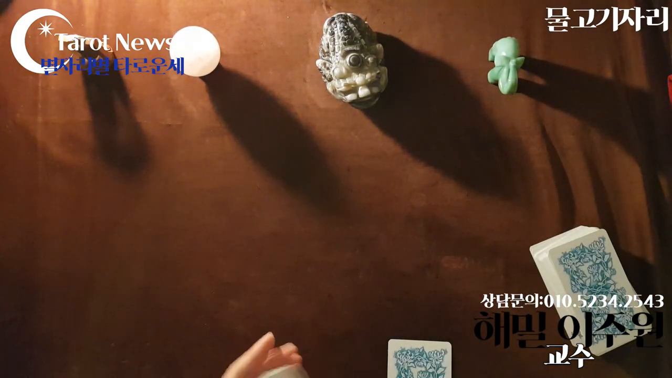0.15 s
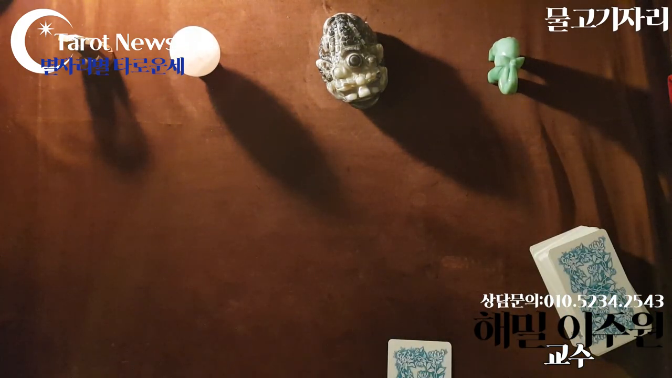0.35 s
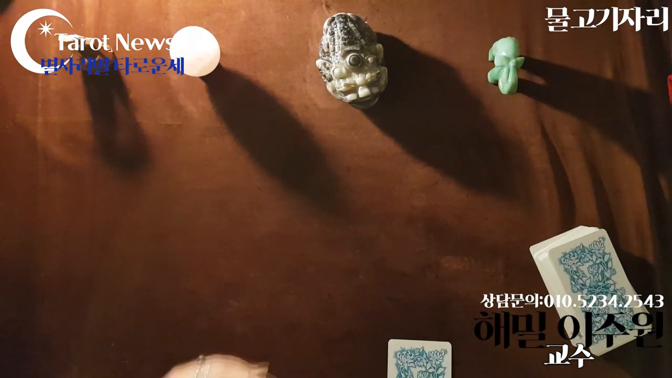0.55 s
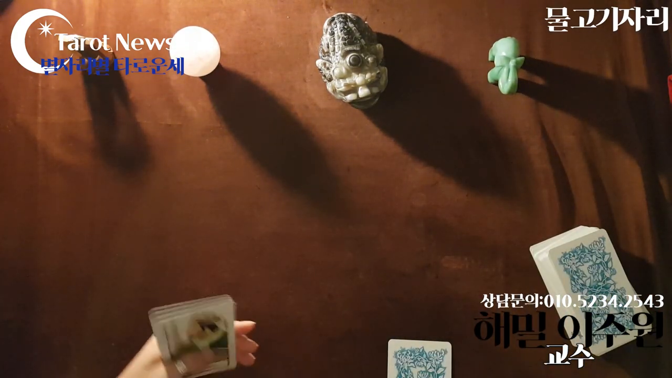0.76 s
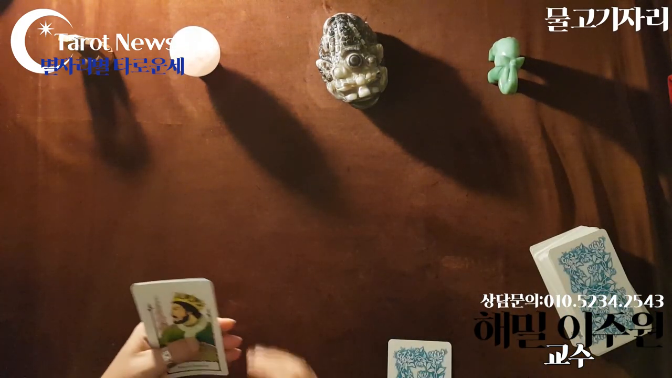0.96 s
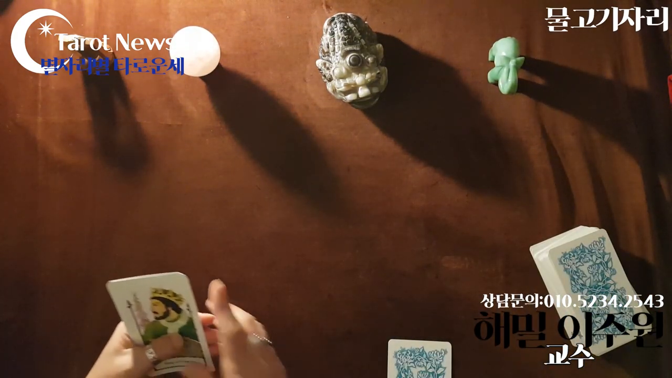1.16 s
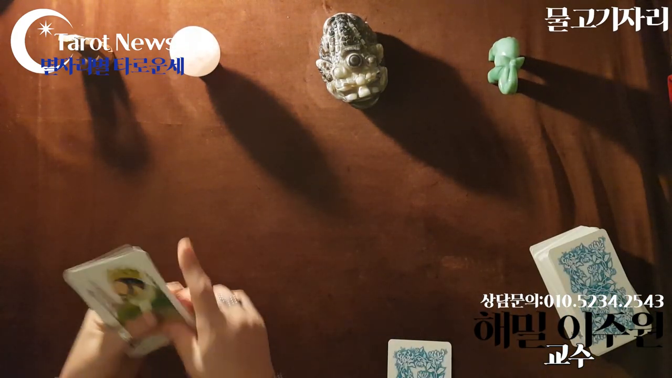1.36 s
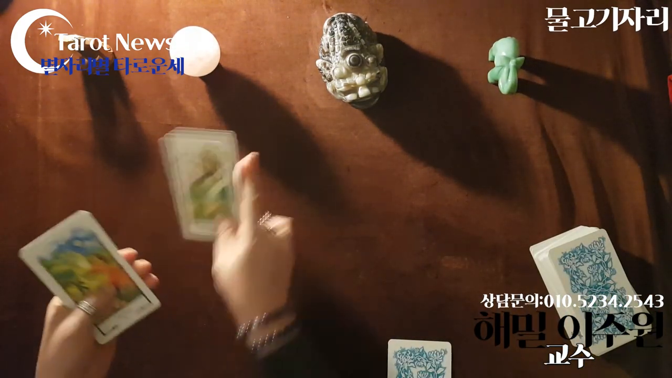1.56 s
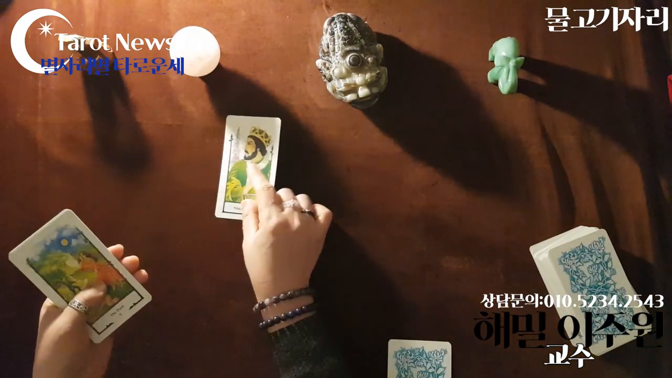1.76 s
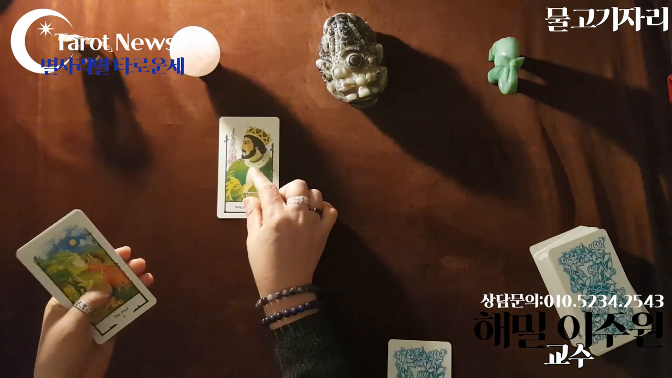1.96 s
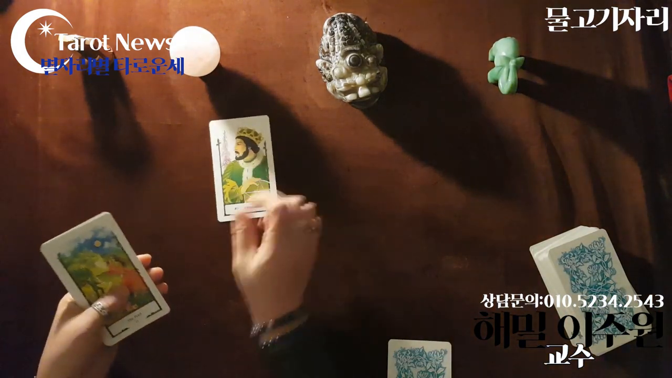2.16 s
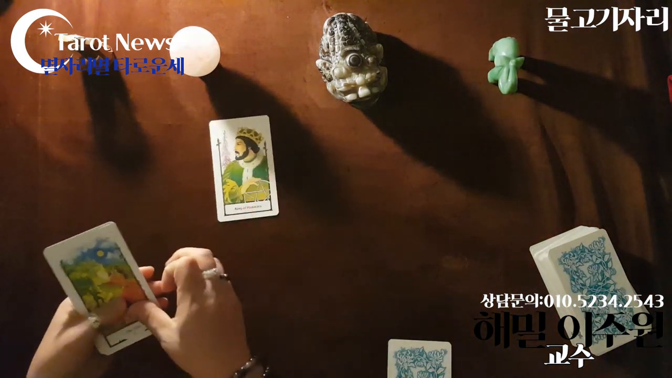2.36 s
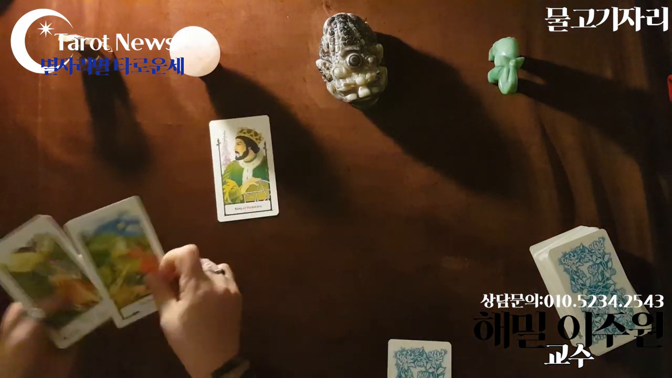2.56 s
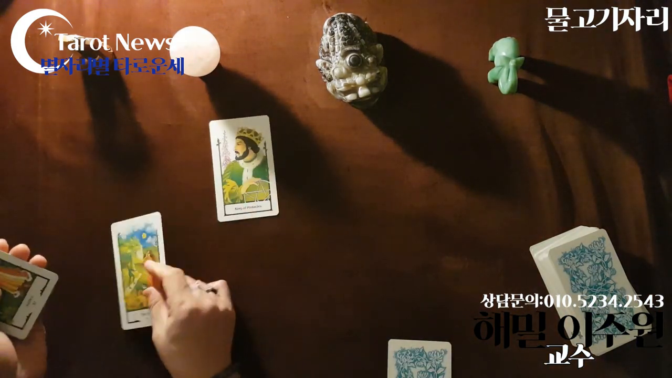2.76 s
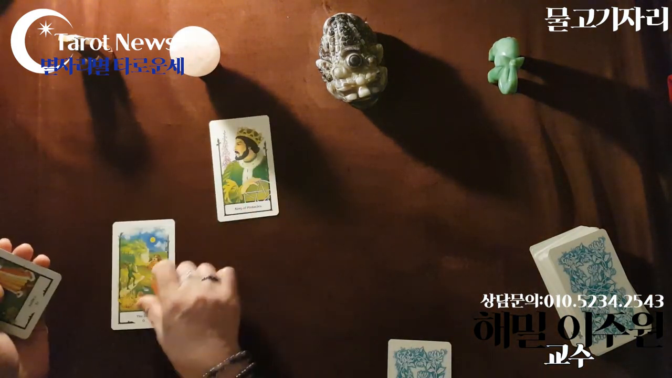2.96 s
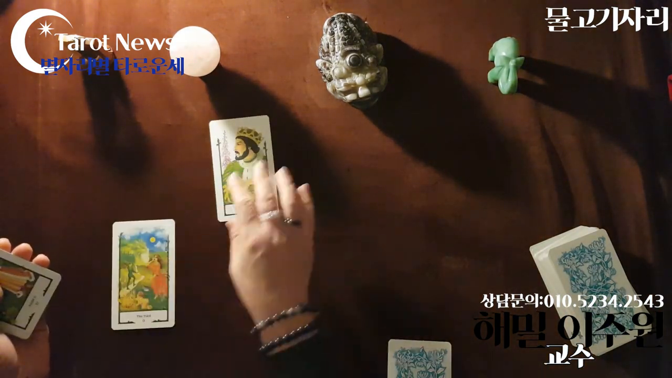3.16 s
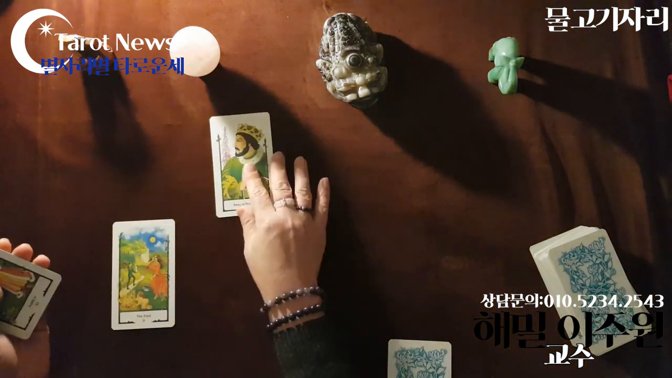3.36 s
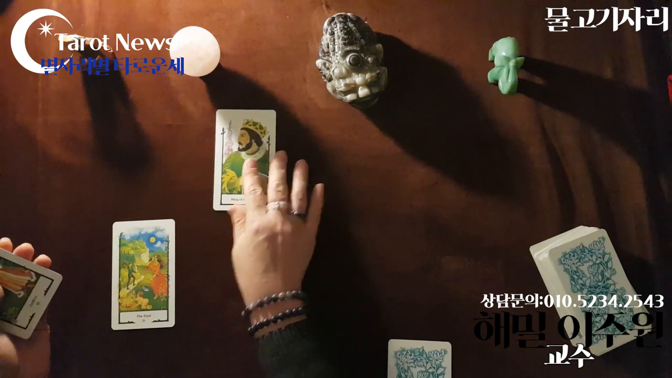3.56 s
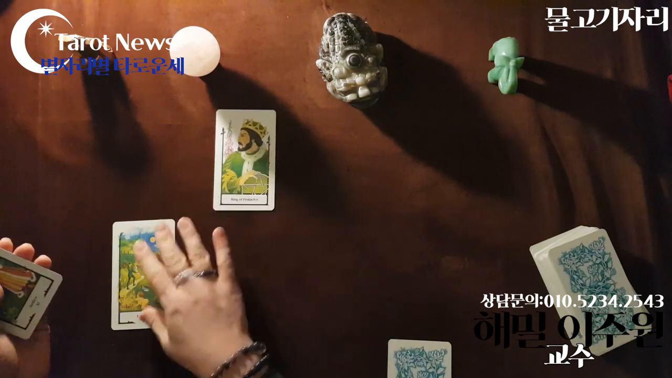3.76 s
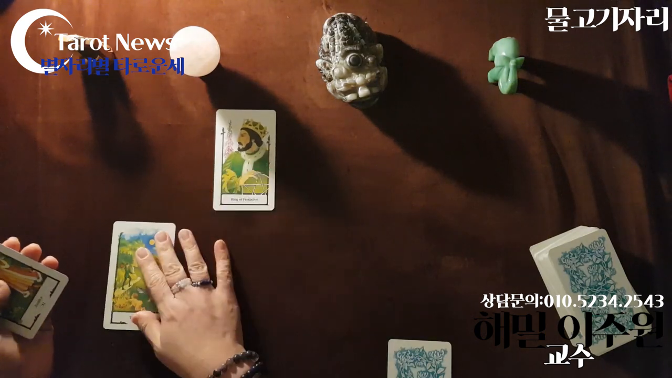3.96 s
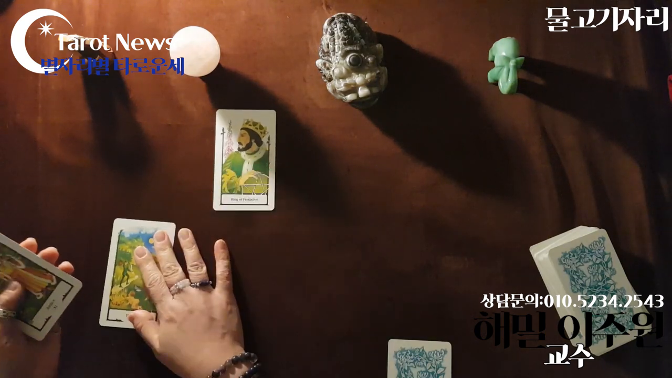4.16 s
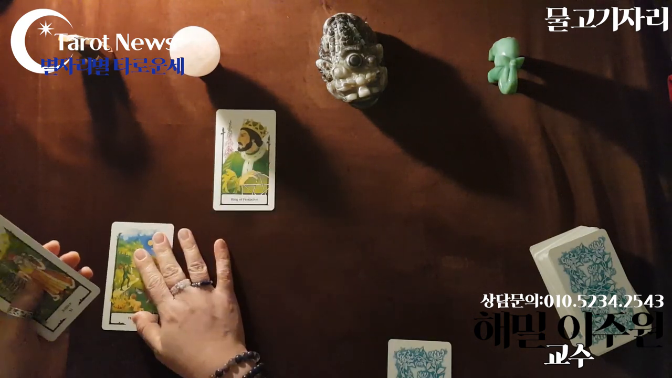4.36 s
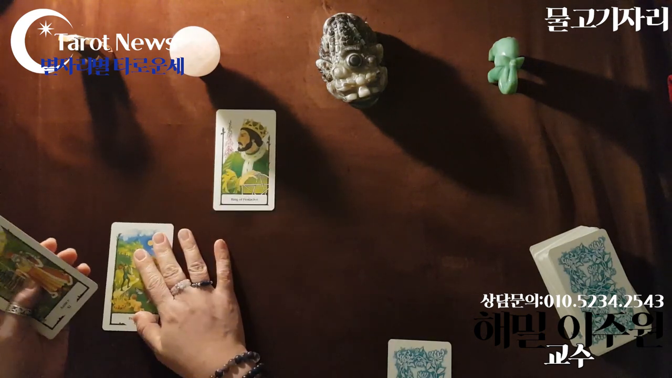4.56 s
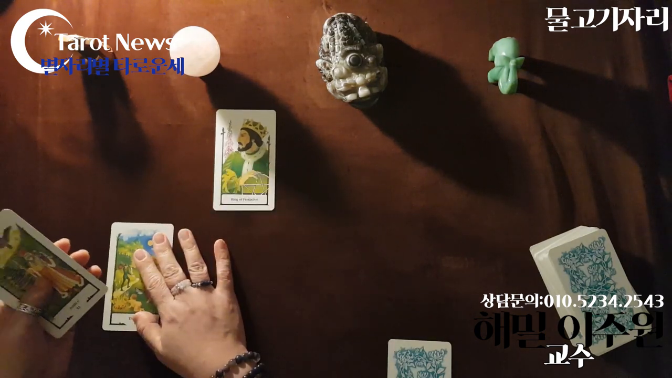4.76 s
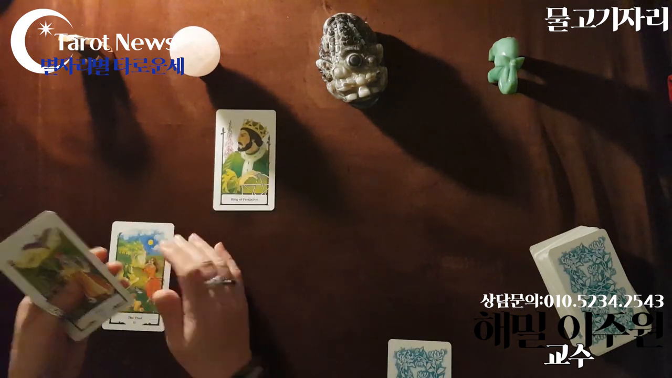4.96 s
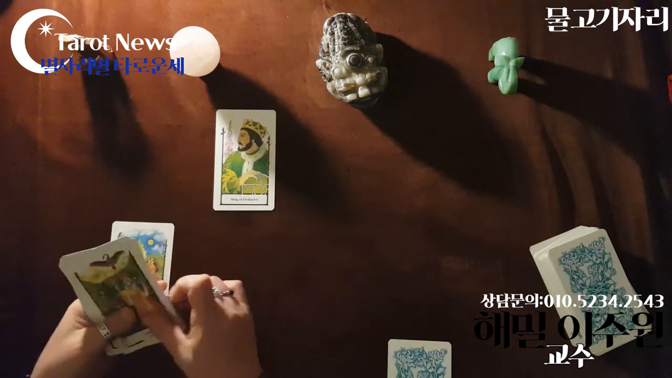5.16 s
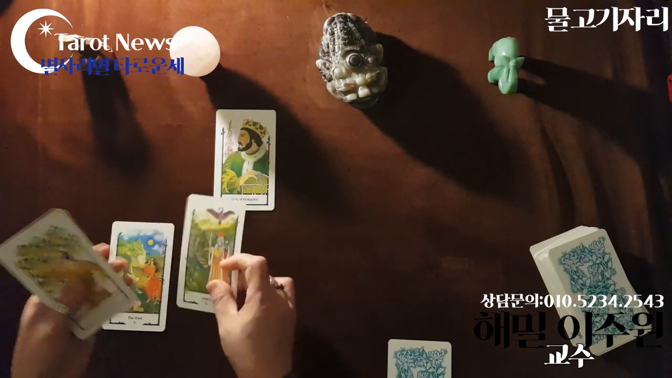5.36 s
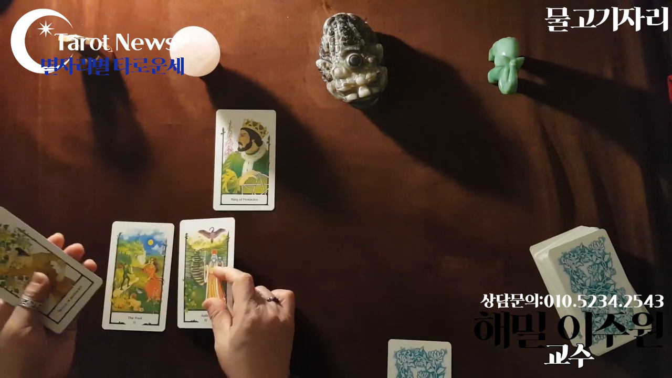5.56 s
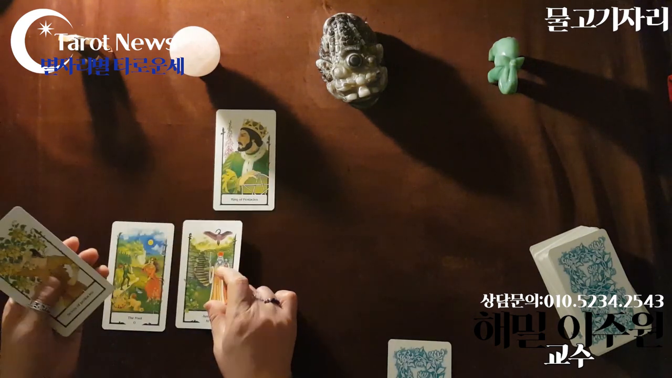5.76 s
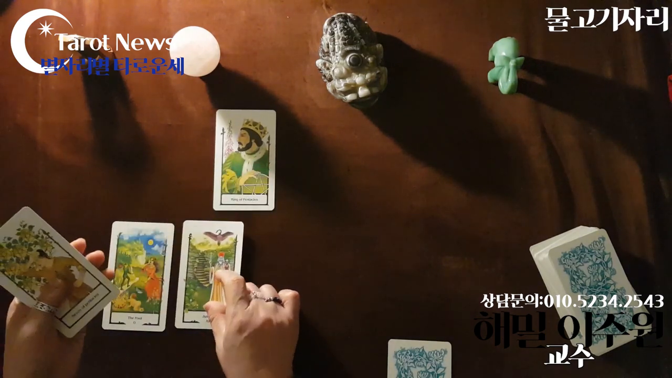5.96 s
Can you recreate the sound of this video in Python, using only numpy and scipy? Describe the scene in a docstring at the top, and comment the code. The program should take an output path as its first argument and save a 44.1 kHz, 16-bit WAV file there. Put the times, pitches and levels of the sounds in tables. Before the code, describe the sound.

Close stereo microphones in a small, quiet room with low rumble and faint hiss. Fingers lightly brush cards, then the pack lands with a short hollow knock on the table. After a pause, a card slides off with a brief bright hiss, flicks free and is laid with a crisp snap. Another follows a second later, then faint nudges and a long lull before a third, softer draw and final clicks.

```python
"""A cloth-covered table in a small quiet room, heard close up by a left and a right microphone.
Low building rumble and microphone hiss, made of shaped noise, lie underneath from the first moment.
Fingers brush the cards with grainy noise; then the pack is squared with a rattle that rings the table top.
After that cards are dealt one by one: each hisses off the pack as a swelling noise, flicks free and snaps
down flat as a click through short resonances, with more finger brushes and nudges in between."""
import sys
import numpy as np
from scipy import signal
from scipy.fft import rfft, irfft
from scipy.io import wavfile

SR = 44100
rng = np.random.default_rng(int(sys.argv[2]) if len(sys.argv) > 2 else 0)


def log_audio(samples):
    """Write samples as a 16-bit WAV file to the path given in sys.argv[1]."""
    # one column per channel
    frames = np.atleast_2d(samples).T
    # limit to full scale, then quantise
    limited = np.clip(frames, -1, 1)
    pcm = np.round(limited * 32767).astype(np.int16)
    wavfile.write(sys.argv[1], SR, pcm)


N = 265041

# relative spectrum of the room's background: (frequency [Hz], density [dB per Hz])
FLOOR_SPECTRUM = [(12, -53), (20, -17.5), (43, -2), (65, -16), (88, -4.5), (138, -5.5), (177, -16),
                  (513, -23), (558, -23.5), (642, -26), (2460, -28), (3530, -31), (16000, -30)]
# how alike the background is at the two microphones: (frequency [Hz], correlation [-1 to 1])
FLOOR_LIKENESS = [(30, .85), (100, .92), (250, .8), (550, .34), (1500, 0), (15000, -.05)]
# hum near 100 Hz, before a slight left-right tilt: (time [s], level [dB])
HUM_LEVEL = [(0.0, -91), (0.44, -73), (1.29, -77.5), (1.66, -68), (2.19, -84.5), (2.56, -68), (2.83, -78),
             (3.45, -66.5), (3.71, -70.5), (3.98, -70), (4.3, -67.5), (4.6, -78), (5.09, -65), (5.26, -72),
             (5.49, -64), (6.01, -72.5)]
# relative spectrum of paper sliding on paper: (frequency [Hz], density [dB per Hz])
SLIDE_SPECTRUM = [(2940, -21), (5000, -23), (5960, -6.5), (8840, -3.5), (10600, -2), (13800, 2),
                  (16000, -3.5)]
# fingers brush, grip and nudge the cards: (start [s], length [s], hiss before the skin filter and placing [dB],
# change over the stroke [dB], rasp against hiss [dB], scuff against hiss [dB],
# scuff at start [Hz], scuff at end [Hz], upper against lower scuff band [dB])
FINGER_BRUSHES = [(0.0, 0.026, -65.5, -15.5, -0.5, -4, 1690, 1780, -12),
                  (0.267, 0.087, -57.5, -6, -17.5, -18, 2123, 1925, -28),
                  (0.369, 0.037, -68, 2, -12, -9, 1800, 1800, -30),
                  (0.667, .055, -53, -9.5, -7.5, 2, 1156, 1100, -9.5),
                  (0.842, 0.056, -77.5, -15, -4, 2, 2070, 2080, -13),
                  (0.942, 0.036, -67, -5, -2, -2.5, 2236, 2370, -21),
                  (1.242, 0.046, -67.5, -12.5, -8.5, -10.5, 2270, 2230, -4.5),
                  (1.351, .05, -85, 1, 2.5, 1.5, 2200, 2225, -9),
                  (1.67, 0.11, -67, -0.5, -14.5, -16.5, 1884, 1990, -22),
                  (1.776, 0.25, -75.5, -0.5, 2, -5, 2276, 2153, 0),
                  (2.211, .03, -69.5, -12, -5.5, -17.5, 1960, 1925, -20),
                  (2.471, .04, -87, -5, -3, 9, 2450, 2410, -2),
                  (2.773, 0.061, -70, -2.5, -8.5, -6.5, 1540, 1480, -15),
                  (2.854, 0.078, -72.5, 9, 0.5, 0, 1447, 1450, -1.5),
                  (3.353, 0.054, -78, -17, 5, 2, 2536, 2530, -19),
                  (3.448, 0.069, -78, -3.5, -6, -19, 1756, 1700, -22),
                  (3.61, 0.039, -78, 4, -18, -29, 1780, 1825, -23.5),
                  (3.861, 0.048, -73, -18, 7.5, 1.5, 2426, 2510, -11),
                  (4.05, 0.089, -73.5, -3.5, -9, -22, 2400, 2400, -1),
                  (4.892, 0.12, -82.5, 2, -8.5, -15, 1750, 1680, -21.5),
                  (5.19, 0.031, -90, 5.5, 5, 4, 2470, 2310, 3),
                  (5.544, 0.042, -77, 2, -7.5, -8, 1540, 1390, -19.5),
                  (5.888, 0.19, -88.5, 27, 9, 0.5, 1850, 1820, -1)]
# long waves reach both microphones alike in the reverberation: (frequency [Hz], correlation [-1 to 1])
ROOM_LIKENESS = [(150, 0.9), (300, 1), (500, 1), (1500, 0.29), (12000, 0)]
# time for the room to die by 60 dB: (frequency [Hz], decay time [s])
ROOM_DECAY = [(100, 0.23), (260, 0.27), (700, 0.22), (1800, 0.19), (5000, 0.17), (13000, 0.17)]
# relative starting level of the reverberation: (frequency [Hz], level [dB])
ROOM_COLOUR = [(100, 5), (300, 6), (800, 4), (2000, 4.5), (4500, 3), (13000, 1)]
# card edges let go or slap down, part peaks before placing: (time [s], bend [Hz], bend width [Hz],
# bend peak [dB], edge [Hz], edge width [Hz], edge peak [dB], air peak [dB], thud peak [dB], boom peak [dB],
# left over right [dB], slip decay [ms], share sent to the room [dB])
CARD_SNAPS = [(0.6537, 974, 920, -19, 1900, 900, -35.5, -37.5, -20.5, -30.5, 1.5, 0.7, -1),
              (0.7083, 1050, 700, -52.5, 4240, 1500, -33.5, -43.5, -55.5, -58, 1.5, 0.96, -2),
              (1.5337, 850, 690, -29, 4000, 2600, -22.5, -65, -75, -65, 6.5, 1.8, -6),
              (1.5551, 965, 1500, -25.5, 4860, 2400, -14, -28.5, -37.5, -56, 2, 1.3, -6),
              (1.771, 1530, 700, -59, 2300, 700, -64, -73, -86.5, -73, 6, .9, -2),
              (1.968, 1115, 2000, -32.5, 3780, 840, -23, -36, -42, -59.5, 2, 1.55, 1),
              (2.3440, 858, 696, -62.5, 2200, 1200, -55.5, -60, -76.5, -79, 3, 0.96, -7),
              (2.4730, 758, 705, -74.5, 2460, 600, -57.5, -66, -77, -76.5, 3, 0.88, 1),
              (2.6475, 780, 270, -28, 2572, 2590, -15.5, -31, -84, -58.5, 3, 0.69, -5.5),
              (2.86, 955, 1060, -17, 3400, 1200, -45.5, -55, -32, -78, 1.5, 1, -5.5),
              (2.9522, 1320, 1240, -26.5, 2960, 2960, -17.5, -30.5, -33.5, -45, 2.5, 2.8, -5.5),
              (3.3434, 1700, 900, -54.5, 2600, 1180, -52.5, -55.5, -80, -61.5, 5, 0.44, -3.7),
              (3.863, 1430, 900, -65.5, 2650, 1220, -50, -51.5, -71, -62, 8.5, 0.93, -3.7),
              (5.184, 890, 700, -59.5, 2460, 697, -52.5, -59, -66.5, -65, 1, 0.86, -6),
              (5.3613, 1030, 820, -29.5, 4270, 1502, -32.5, -47, -49, -65, 4, 2.4, -6.5),
              (5.386, 580, 346, -40, 2340, 1500, -66, -66, -49, -64.5, 4, 8.6, -12),
              (5.521, 1546, 700, -77, 5500, 1990, -63, -61, -84, -80, 12, .9, -8),
              (5.746, 1250, 1100, -14.5, 2360, 1310, -30.5, -45.5, -36.5, -51, 2, 0.82, -3.5),
              (5.998, 1760, 694, -28.5, 5480, 1590, -21.5, -64, -54, -47, 6, 3.5, -6)]
# resonances of the table top under the pack: (frequency [Hz], width [Hz], relative level [dB])
TABLE_TOP = [(103.8, 32, -20.5), (190, 60, -1), (339, 24, 5), (433, 68, 1.5), (600, 33, -16), (955, 50, 0),
             (1100, 64, -6), (1430, 83, -12), (2100, 360, -25.5)]
# cards drawn off the pack: (start [s], length [s], hiss at the start before placing [dB], scuff [Hz])
CARD_DRAWS = [(1.42, 0.1, -51, 2275), (2.533, 0.089, -51, 2310), (5.239, .115, -52.5, 1343)]

LIFT_DB_PER_S = 897.5    # fade as a finger or card leaves


def from_db(db):
    """Decibels to gain."""
    return 10 ** (np.asarray(db) / 20)


def rms_one(x):
    """Scale to unit rms."""
    return x / np.sqrt(np.mean(x ** 2) + 1e-20)


def at_hz(points, hz):
    """Read a table on a log-frequency axis."""
    table_hz, values = np.transpose(points)
    return np.interp(np.log(hz), np.log(table_hz), values)


def spectrum_hz():
    """Frequencies of the bins of a full-length spectrum, kept above zero for the log axis."""
    return np.maximum(np.fft.rfftfreq(N, 1 / SR), 1)


def drift(rate_hz):
    """Random wandering of spread 1, mostly slower than the rate."""
    step = 40    # samples between drawn points
    r = np.exp(-2 * np.pi * rate_hz * step / SR)
    white = rng.standard_normal(N // step + 2002)
    slow = signal.lfilter([1], [1, -2 * r, r * r], white)[2000:]    # drop the filter's start-up
    return np.interp(np.arange(N) / step, np.arange(len(slow)), rms_one(slow))


def resonance(x, hz, width_hz):
    """Two-pole resonance, gain about 1 on top."""
    r = np.exp(-np.pi * width_hz / SR)
    poles = [1, -2 * r * np.cos(2 * np.pi * hz / SR), r * r]
    return signal.lfilter([(1 - r * r) / 2, 0, (r * r - 1) / 2], poles, x)


def filtered(x, order, hz, kind="low"):
    """Butterworth filter."""
    return signal.sosfilt(signal.butter(order, hz, kind, fs=SR, output="sos"), x)


def low_pass(x, hz):
    """Steep roll-off above hz."""
    return filtered(x, 4, hz)


def two_ears(mid, side, alike):
    """Left and right from two independent noises, with the given correlation."""
    return np.sqrt(1 + alike) * mid + np.sqrt(1 - alike) * side * [[1], [-1]]


def placed(x, pan_db):
    """Place a near source: pan_db louder on the left, and always earlier there."""
    right_lag_s = .00022
    late = np.pad(x, (round(right_lag_s * SR), 0))[:len(x)]
    return np.array([x * from_db(pan_db / 2), late * from_db(-pan_db / 2)])


def envelope_db(start_s, length_s, rise_db_per_s, slope_db_per_s, fall_db_per_s):
    """Rise to 0 dB at the start, slope through the length, fall away; also the seconds held so far."""
    t = np.arange(N) / SR - start_s
    held = np.clip(t, 0, length_s)
    rise = rise_db_per_s * np.minimum(t, 0)
    fall = fall_db_per_s * np.maximum(t - length_s, 0)
    return rise + slope_db_per_s * held - fall, held


def floor():
    """Building rumble largely shared by both microphones, swelling slowly; nearly separate hiss in each."""
    floor_db, deep_db = -70.5, -81.5
    hz = spectrum_hz()
    mid, side = rfft(rng.standard_normal((2, N))) * from_db(at_hz(FLOOR_SPECTRUM, hz))
    noise = rms_one(irfft(two_ears(mid, side, at_hz(FLOOR_LIKENESS, hz)), N))

    rumble = signal.lfilter([.08], [1, -.92], noise)
    swell = from_db(2.5 * drift(0.77))
    background = from_db(floor_db) * (noise + rumble * (swell - 1))    # only the low part swells

    hum_times, hum_levels = np.transpose(HUM_LEVEL)
    hum_db = np.interp(np.arange(N) / SR, hum_times, hum_levels)
    hum = rms_one(resonance(resonance(rng.standard_normal(N), 98, 29), 98, 50))

    deep = rms_one(resonance(resonance(rng.standard_normal(N), 47, 17), 50, 40))
    deep_waver_db = 5 * drift(1.5)
    total = background + from_db(hum_db) * hum + from_db(deep_db + deep_waver_db) * deep
    return total * from_db([[.4], [-.4]])    # a touch louder on the left


def paper_friction():
    """Paper on paper: fine grain gives a bright hiss, a broad rasp and the slow noise behind the scuffs."""
    rasp_hz, rasp_width_hz, scuff_width_hz = 4000, 6800, 180
    grain = rng.standard_normal((3, N)) * from_db(1.5 * drift(60))
    shaped = rfft(grain[0]) * from_db(at_hz(SLIDE_SPECTRUM, spectrum_hz()))
    hiss = rms_one(irfft(shaped, N))
    rasp = rms_one(resonance(resonance(grain[1], rasp_hz, rasp_width_hz), rasp_hz, rasp_width_hz))
    pole = np.exp(-2 * np.pi * scuff_width_hz / SR)
    slow = rms_one(signal.lfilter([1], [1, -pole], low_pass(grain[2], 350)))
    return hiss, rasp, slow


def scuff(slow, hz, upper_db):
    """The card's own two narrow bands: slow noise carried on a tone and on a second one 1.7 times higher."""
    phase = 2 * np.pi * np.cumsum(hz) / SR
    return slow * np.sqrt(2) * (np.cos(phase) + from_db(upper_db) * np.cos(1.7 * phase))


def brushes(hiss, rasp, slow):
    """Fingers stroke the cards: skin hisses duller than card on card, and the scuff pitch glides."""
    rise_db_per_s = 849
    skin = filtered(hiss, 1, 9200)
    out = np.zeros(N)
    for start, length, hiss_db, change_db, rasp_db, scuff_db, hz, end_hz, upper_db in FINGER_BRUSHES:
        db, held = envelope_db(start, length, rise_db_per_s, change_db / length, LIFT_DB_PER_S)
        gliding_hz = hz + (end_hz - hz) * held / length
        friction = skin + from_db(rasp_db) * rasp
        friction = friction + from_db(scuff_db) * scuff(slow, gliding_hz, upper_db)
        out += from_db(hiss_db + db) * friction
    return out


def room(x):
    """Dense reflections in which each band dies at its own rate, differently at each microphone."""
    t = np.arange(SR // 2) / SR
    tail = 0
    edges = 70 * 2 ** np.arange(0, 8.1, .5)    # half-octave bands [Hz]
    white = rng.standard_normal((2, len(t)))
    for low, high in zip(edges, edges[1:]):
        hz = np.sqrt(low * high)
        mid, side = filtered(white, 2, [low, high], "band")
        band = two_ears(mid, side, at_hz(ROOM_LIKENESS, hz))
        tail = tail + band * from_db(at_hz(ROOM_COLOUR, hz) - 60 * t / at_hz(ROOM_DECAY, hz))
    # the table top answers at once, the walls about 2 to 3.5 ms later
    tail = tail * np.clip((t - .0017) / .002 + 0.1, .3, 1)
    tail = tail / np.sqrt(np.sum(tail ** 2) / 2)
    return signal.fftconvolve(x, tail, axes=1)[:, :N]


def snaps():
    """Each release is a click that sets the bent card, its edge, the air and the table ringing briefly.
    Returns what goes straight to the microphones and what goes into the room."""
    size, release_s = 4096, .006    # window [samples], moment of release inside it
    near, far = np.zeros((2, N + size)), np.zeros((2, N + size))
    t = np.arange(size) / SR
    for row, noise in zip(CARD_SNAPS, rng.standard_normal((len(CARD_SNAPS), size))):
        (s, bend_hz, bend_width, bend_db, edge_hz, edge_width, edge_db,
         air_db, thud_db, boom_db, pan_db, slip_ms, room_db) = row
        # the edge slips over a few fibres and lets go
        slip = noise * np.exp(-np.abs(t - release_s) * 1000 / slip_ms)
        click = t == round(release_s * SR) / SR
        contact = 0.044 * slip + click

        bend = resonance(resonance(contact, bend_hz, bend_width), bend_hz, 2000)
        edge = resonance(resonance(contact, edge_hz, edge_width), edge_hz, 4600)
        parts = [(bend_db, low_pass(bend, 2.07 * bend_hz)),
                 (edge_db, -low_pass(edge, 3.4 * edge_hz)),
                 (air_db, filtered(contact + .15 * slip, 2, [6000, 12000], "band")),
                 (thud_db, low_pass(resonance(contact, 350, 340), 740)),
                 (boom_db, low_pass(resonance(contact, 180, 32), 360))]
        mixed = sum(from_db(db) * part / np.abs(part).max() for db, part in parts)
        snap = placed(mixed, pan_db)
        at = round((s - release_s) * SR)
        near[:, at:at + size] += snap
        far[:, at:at + size] += from_db(room_db) * snap
    return near[:, :N], far[:, :N]


def pack():
    """The cards of the pack land in a dense rattle that drives the table top."""
    start_s, length_s, start_db = .654, 0.0568, -27.5
    edge_db_per_s, sag_db_per_s = 9016, -130
    level_db, _ = envelope_db(start_s, length_s, edge_db_per_s, sag_db_per_s, edge_db_per_s)
    landing = rng.standard_normal(N) * from_db(2.0 * drift(90))
    top = np.zeros(N)
    for k, (hz, width_hz, db) in enumerate(TABLE_TOP):
        top += (-1) ** k * from_db(db) * resonance(landing, hz, width_hz)    # neighbours in opposite sign
    return from_db(start_db + level_db) * rms_one(low_pass(top, 2500))


def draws(hiss, rasp, slow):
    """A card slides off the pack: the hiss swells while rasp and scuff grow against it."""
    rise_db_per_s, swell_db_per_s = 1100, 5.5
    rasp_db, rasp_db_per_s = -12.5, 91      # against the hiss: at the start, then growth
    scuff_db, scuff_db_per_s = -23.5, 72
    thin_rasp = filtered(rasp, 3, 3400, "high")
    out = np.zeros(N)
    for start, length, hiss_db, hz in CARD_DRAWS:
        db, held = envelope_db(start, length, rise_db_per_s, swell_db_per_s, LIFT_DB_PER_S)
        friction = hiss + from_db(rasp_db + rasp_db_per_s * held) * thin_rasp
        bands = scuff(slow, np.full(N, hz), upper_db=1.0)
        friction = friction + from_db(scuff_db + scuff_db_per_s * held) * bands
        out += from_db(hiss_db + db) * friction
    return out


def scene():
    """Hands and cards close to the microphones, in the room, over the floor."""
    background = floor()
    friction = paper_friction()
    strokes = placed(brushes(*friction) + draws(*friction), pan_db=3.0)
    near, far = snaps()
    rattle = placed(pack(), pan_db=-1.0)
    into_room = strokes + far + from_db(-8.5) * rattle
    return strokes + rattle + near + from_db(3.5) * room(into_room) + background


def record(dry):
    """The top is cut steeply, 70 dB down from about 16.4 kHz."""
    return signal.sosfilt(signal.cheby2(14, 70, 15950 * 1.03, fs=SR, output="sos"), dry)


dry = scene()
out = record(dry)
log_audio(out)
```